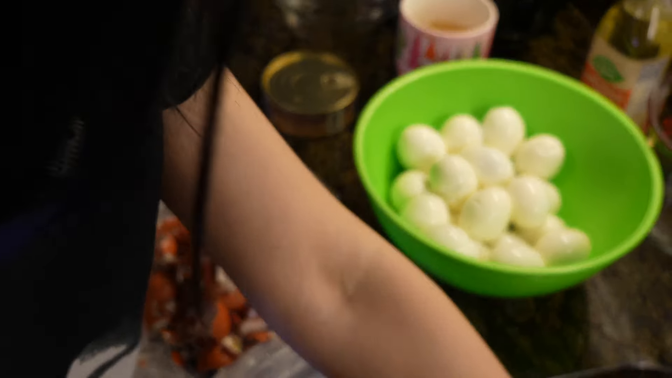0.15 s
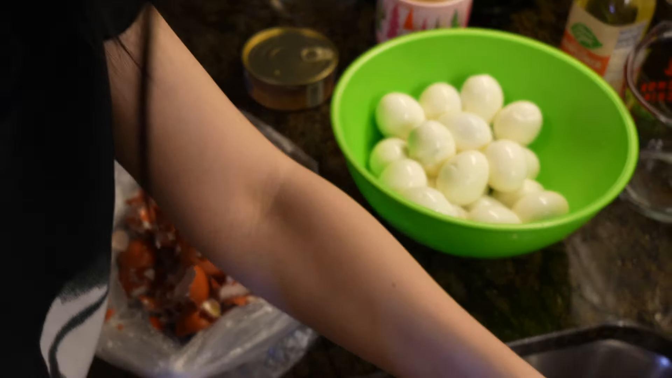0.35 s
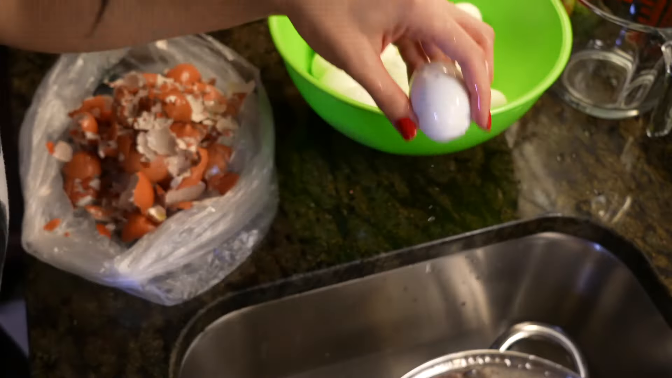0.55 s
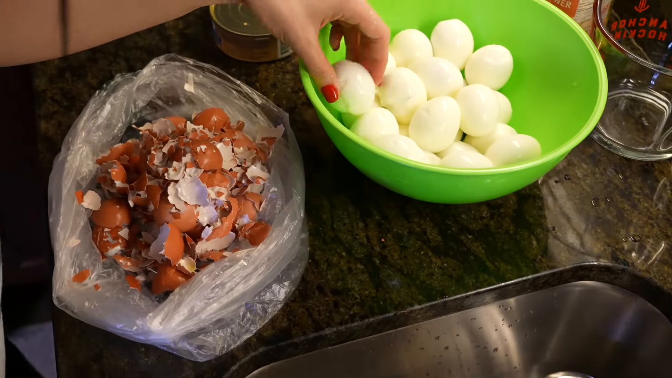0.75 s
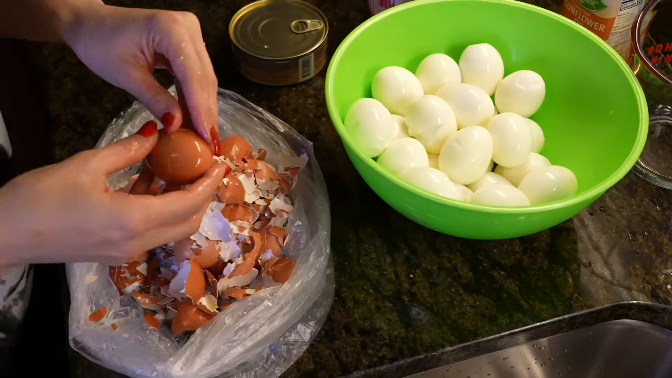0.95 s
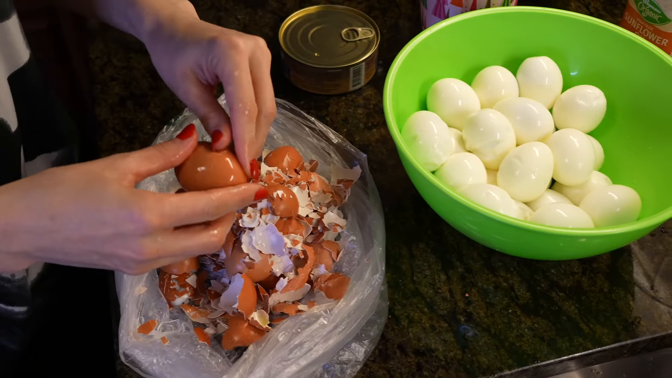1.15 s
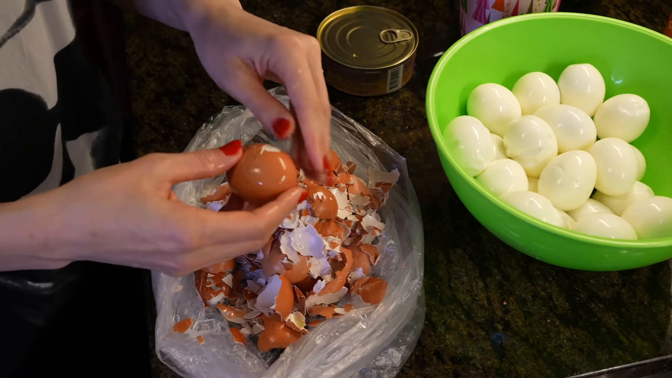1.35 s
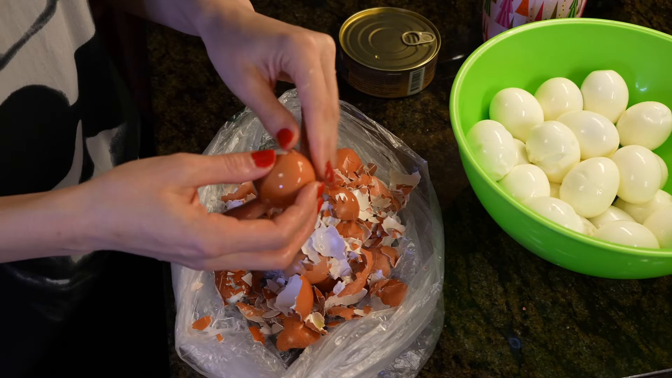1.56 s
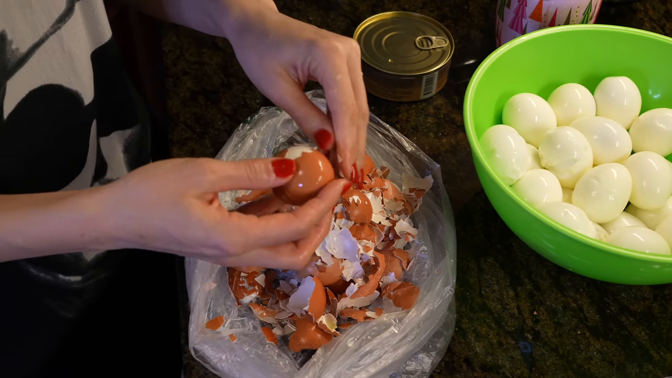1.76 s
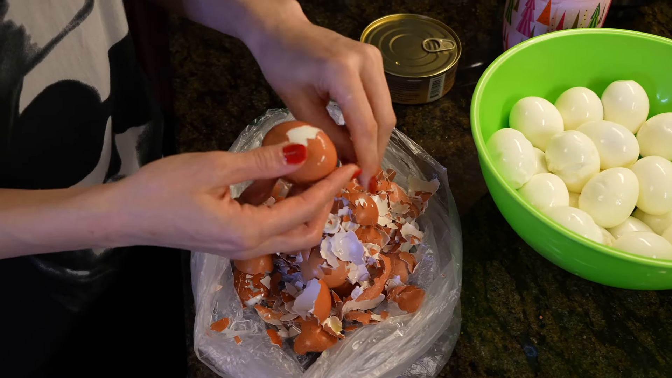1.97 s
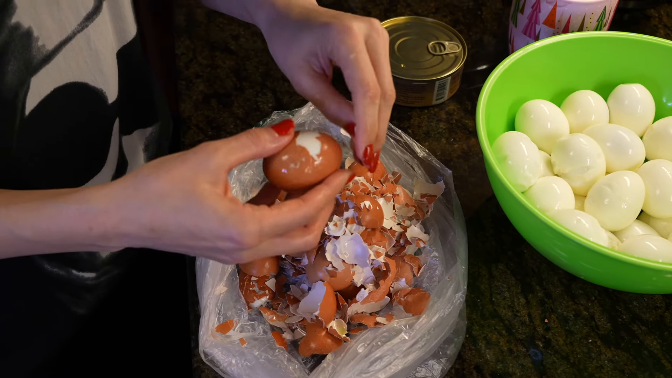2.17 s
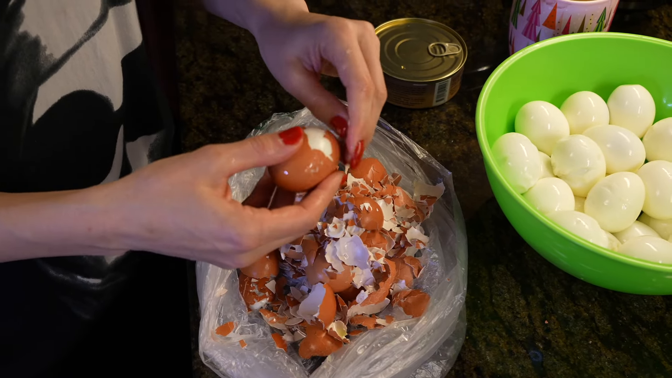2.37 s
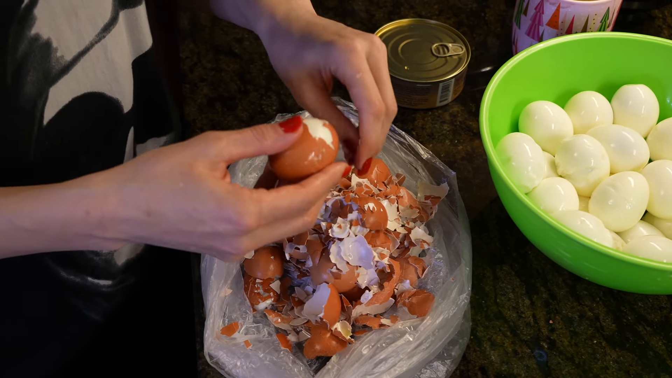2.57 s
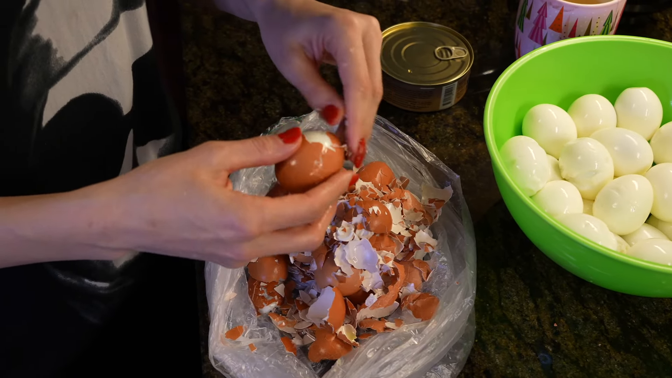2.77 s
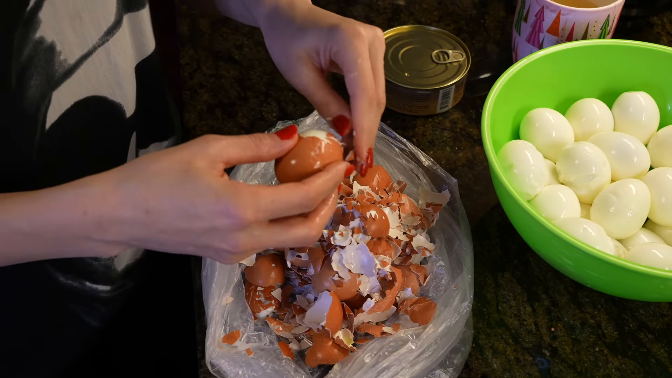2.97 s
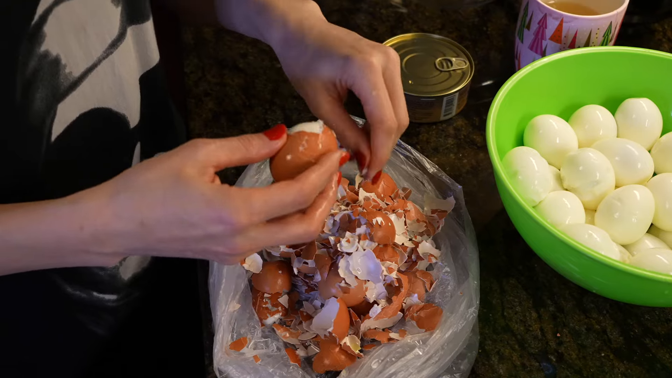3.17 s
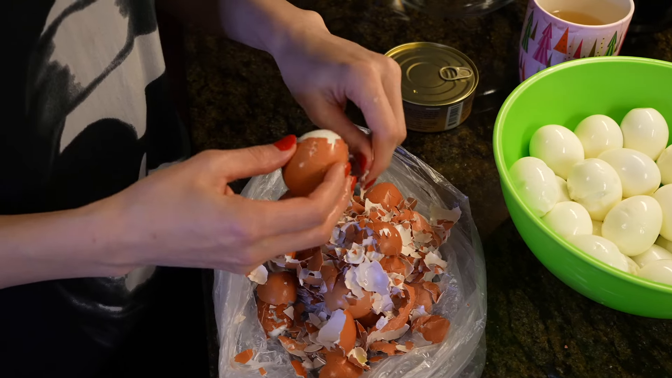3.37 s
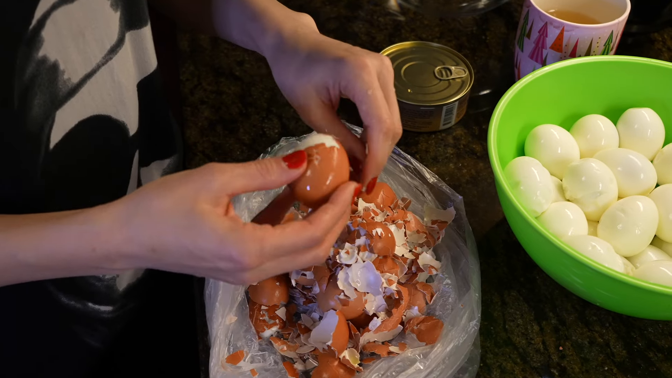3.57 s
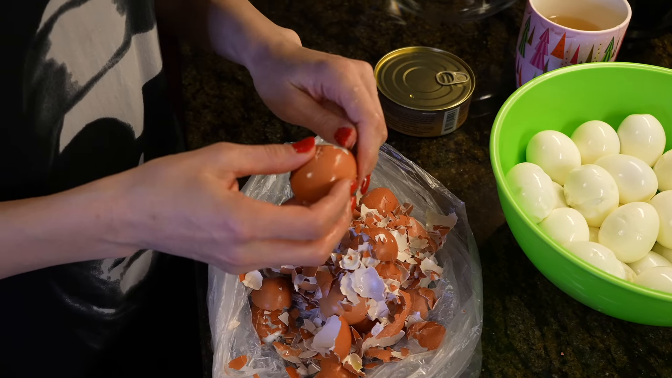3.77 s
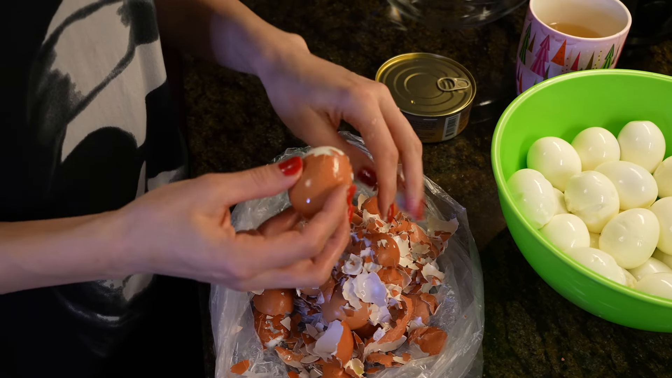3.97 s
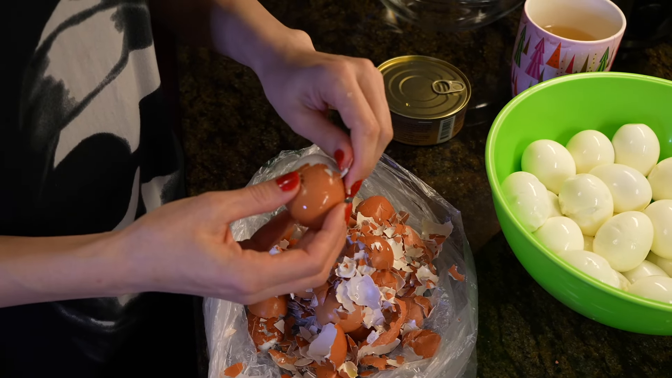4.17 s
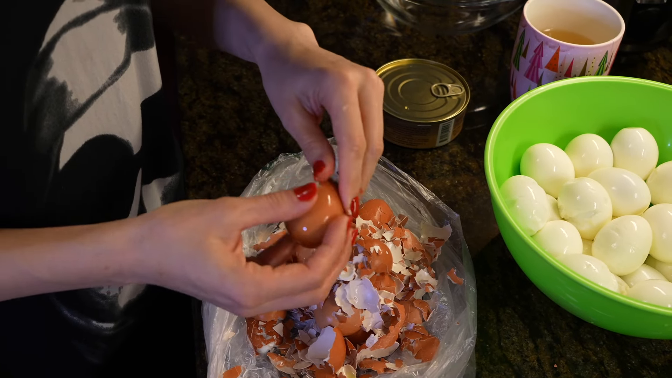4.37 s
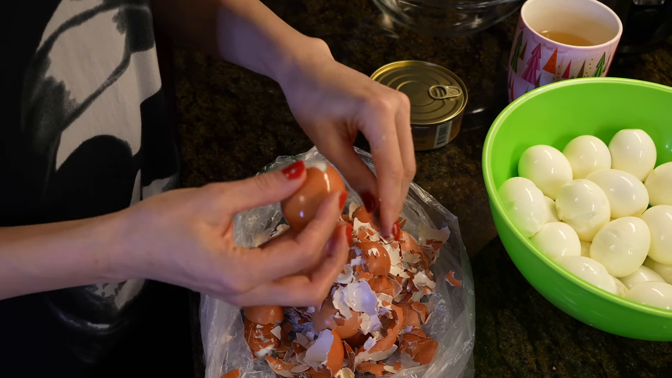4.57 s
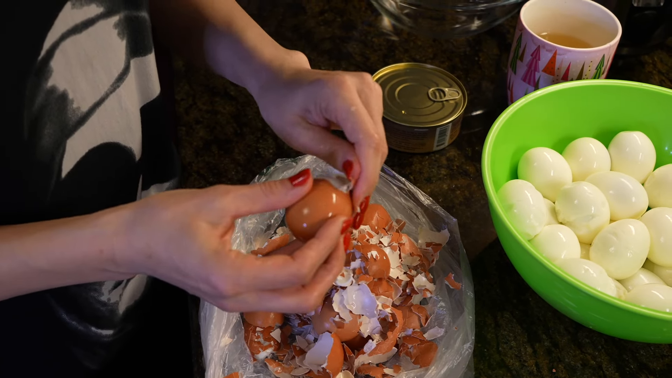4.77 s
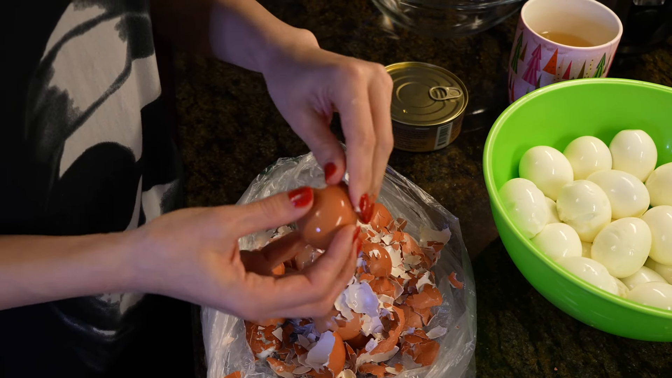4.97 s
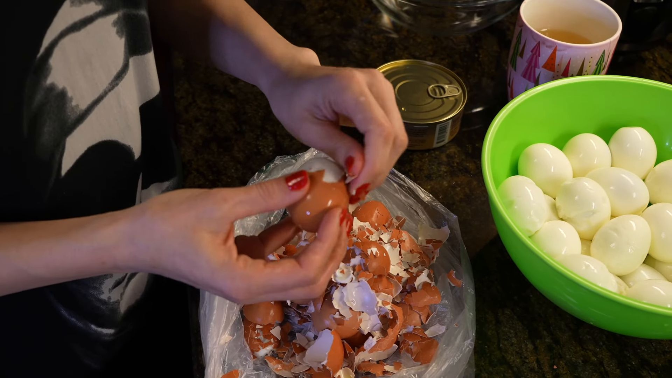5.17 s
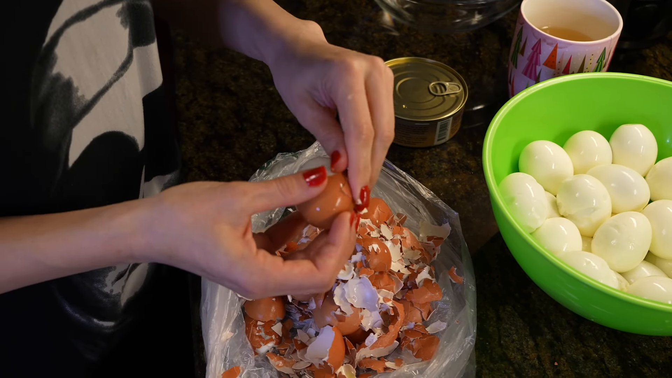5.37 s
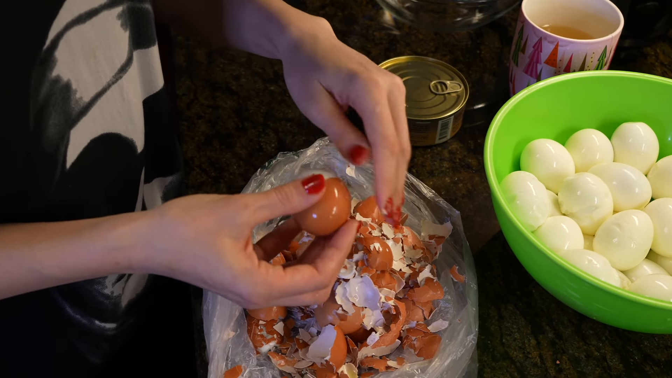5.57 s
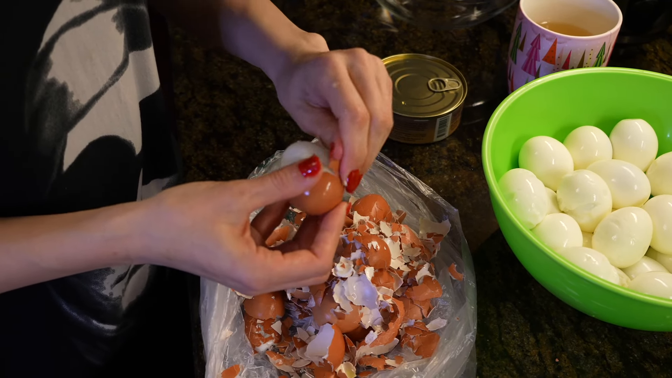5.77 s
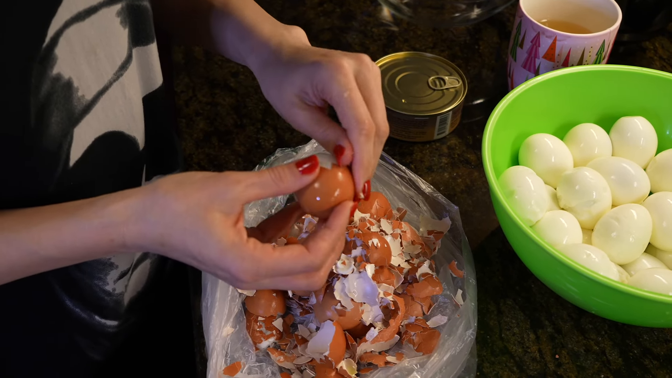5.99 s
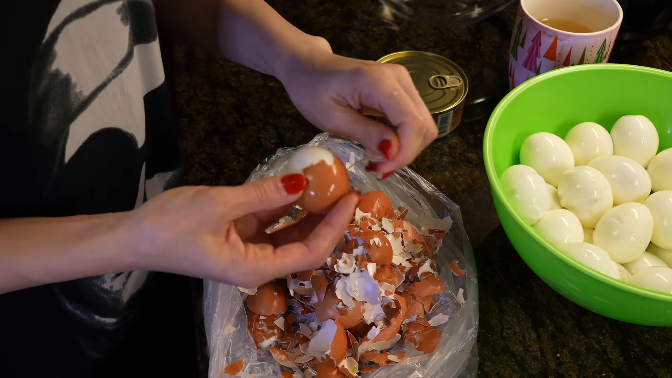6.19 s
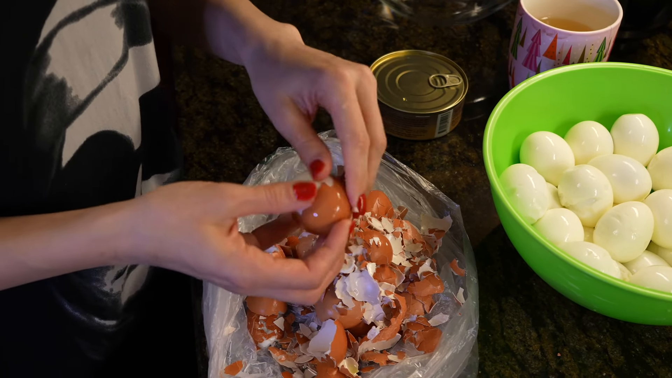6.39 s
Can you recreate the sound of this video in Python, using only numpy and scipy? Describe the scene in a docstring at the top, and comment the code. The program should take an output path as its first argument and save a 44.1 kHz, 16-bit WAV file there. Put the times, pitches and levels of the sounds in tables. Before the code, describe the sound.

A short bright splash of water with bubbly plinks in a steel strainer, then quiet eggshell crackles and soft finger knocks over a faint fridge hum.

```python
"""Boiled eggs are handled over a sink and then peeled by hand in a quiet kitchen.
First water splashes in a steel strainer: hiss and grains, ringing bubbles and smacks on the steel.
Then shell cracks in thin bright snaps of click and fizz, fingers knock softly on low ringing modes,
and one drop falls with steady and gliding rings. Behind it all a refrigerator hums in wavering tones
and air noise, while something hollow drones near 833 Hz and swells when the hands knock."""
import sys
import numpy as np
from scipy import signal
from scipy.fft import rfft, irfft
from scipy.io import wavfile
from scipy.ndimage import uniform_filter1d

SR = 44100
rng = np.random.default_rng(int(sys.argv[2]) if len(sys.argv) > 2 else 0)


def pcm_store(signal):
    """Save signal as 16-bit PCM."""
    levels = np.round(np.clip(np.atleast_2d(signal), -1, 1) * 32767)
    wavfile.write(sys.argv[1], SR, levels.astype(np.int16).T)


N = 283563

# The course of the splash. Each row: time in seconds, slosh level in dB, spray level in dB.
SPLASH_COURSE = [(0.0, -33.5, -57), (0.106, -39.5, -34.5), (0.248, -36.5, -30), (0.29, -36.5, -28),
                 (0.335, -42, -34), (0.35, -38.5, -24.5), (0.4, -26, -29), (0.46, -37, -28),
                 (0.516, -36.5, -44), (0.582, -39, -54), (0.66, -92, -76)]
# Soft knocks of fingers and egg. Each row: start in seconds, level in dB, level of the scuff in dB.
FINGER_KNOCKS = [(1.228, -31, -17), (1.283, -34, -16), (1.32, -45, -13), (1.478, -40, -4), (1.77, -39, -18),
                 (1.957, -34.5, -20), (2.042, -34, -19), (2.148, -42, -18), (2.357, -30, -30),
                 (2.543, -31.5, -19), (2.688, -35, -23), (2.734, -42.5, -1.5), (2.833, -45.5, 7.5),
                 (3.044, -34.5, -15), (3.3, -39, -8), (3.387, -36, -21), (3.504, -33.5, -10.5),
                 (3.606, -33, -18), (3.737, -36, -13), (3.924, -39.5, -10), (4.037, -41, -11.5),
                 (4.222, -33.5, -11), (4.257, -34, -24), (4.403, -39, -10), (4.52, -36.5, -3),
                 (4.856, -30, -21), (5.05, -39.5, -17), (5.128, -35.5, -15), (5.177, -37, -9),
                 (5.209, -38, -7), (5.296, -36, -7.5), (5.459, -42, -10.5), (5.628, -37.5, -8),
                 (5.815, -41, -17), (6.202, -40, -3)]


def amp(db):
    """dB to gain."""
    return 10 ** (np.asarray(db) / 20)


def evened(x):
    """Scales to rms 1."""
    return x / np.sqrt(np.mean(x ** 2) + 1e-20)


def curve(rows, column=1):
    """Draws a table column as a line over all samples."""
    rows = np.array(rows)
    return np.interp(np.arange(N) / SR, rows[:, 0], rows[:, column])


def coloured(x, points):
    """Filters x by a spectrum of (Hz, dB) points."""
    hz, db = np.transpose(points)
    f = np.fft.rfftfreq(len(x), 1 / SR)
    gain = amp(np.interp(np.log(f + 1), np.log(hz + 1), db))
    return irfft(rfft(x) * gain, len(x))


def band(x, lo_hz, hi_hz):
    """Band-pass."""
    return signal.sosfilt(signal.butter(2, [lo_hz, hi_hz], "band", fs=SR, output="sos"), x)


def add(mix, s, sound):
    """Mixes a sound in at second s."""
    part = mix[round(s * SR):][:len(sound)]
    part += sound[:len(part)]


def clicks(per_s, spread_db):
    """A sparse random train of clicks, a few of them large."""
    size = amp(spread_db * np.minimum(rng.exponential(1, N), 4)) * rng.choice([-1., 1.], N)
    return size * (rng.random(N) < per_s / SR)


def wander(span):
    """Slow random motion of rms 1: noise averaged twice over span samples."""
    return evened(uniform_filter1d(uniform_filter1d(rng.standard_normal(N), span), span))


def attack(t, rise_s):
    """A smooth onset that nears 1 with time constant rise_s."""
    return 1 - np.exp(-t / rise_s)


def modes(rows, t):
    """Sums decaying sines, one per (Hz, dB, t60 s) row: the ring of a struck body."""
    return sum(amp(db - 60 * t / t60) * np.sin(2 * np.pi * hz * t) for hz, db, t60 in rows)


def echoed(x, wet_db, t60):
    """Close walls throw back a short scatter of echoes, which roughens every ring."""
    taps = np.zeros(3000)
    at = np.arange(60, 2960, 40) + rng.integers(0, 40, 73)
    taps[at] = rng.choice([-1., 1.], len(at)) * amp(-60 * at / SR / t60)
    taps *= amp(wet_db) / np.linalg.norm(taps)
    taps[0] = 1  # direct sound
    return signal.oaconvolve(x, taps)[:N]


def fridge_air(level):
    """Air noise: coloured random hiss with hollows and humps in its spectrum."""
    # Colour of the air. Each row: frequency in Hz, relative level in dB.
    air_colour = [(12, -62), (20, -20), (179, -30.5), (237, -23), (289, -27.5), (479, -18), (599, -47),
                  (816, -5.5), (913, -9), (994, -7), (1240, -8.5), (2810, -13.5), (7100, -29),
                  (15200, -37.5), (16500, -57)]
    # Hollows and humps. Each row: centre in Hz, width in Hz, gain in dB.
    dips = [(1270, 20, -5.5), (2280, 390, -3.5), (2650, 38, -2), (3000, 80, -2), (3500, 270, 2),
            (3900, 100, -1.5)]
    f = np.fft.rfftfreq(N, 1 / SR)
    hollow = amp(sum(db * np.exp(-((f - hz) / width) ** 2) for hz, width, db in dips))
    air = irfft(rfft(coloured(rng.standard_normal(N), air_colour)) * hollow, N)
    return air * level / np.std(band(air, 1100, 6000))


def fridge_tones(t, level):
    """Motor tones: sines whose strength and phase waver at random and follow the air level."""
    # Each row: frequency in Hz, level in dB.
    hum = [(236.9, -71), (331.5, -87), (414.3, -78.5), (479.6, -70), (662.5, -78.5), (688.5, -72),
           (947.5, -69), (960, -68), (994, -55.5), (1041.7, -67.5), (1325.4, -68), (1377, -76.5),
           (1440.6, -70.5), (1666.2, -75), (1922, -73), (2498, -74), (2842, -78.5), (2880.7, -70),
           (3316.8, -73), (4231, -78), (4715, -79)]
    tones = 0
    for hz, db in hum:
        swing, slip = wander(2000), wander(2000)
        depth = min(hz / 480, 1) ** 3  # low tones are steadier
        phase = 2 * np.pi * (hz * t + rng.random()) + .55 * depth * slip
        tones = tones + amp(db + 3) * (1 + .33 * depth * swing) * np.sin(phase)
    return tones * (level / level.mean()) ** 3.2


def fridge():
    """The refrigerator: air noise and wavering motor tones."""
    # Each row: time in seconds, level of the air in dB.
    air_level = [(0.6, -55.5), (0.73, -59), (1.04, -58), (1.96, -57), (6.43, -57)]
    t, level = np.arange(N) / SR, amp(curve(air_level))
    return fridge_air(level) + fridge_tones(t, level)


def hollow_drone():
    """Handling shakes something hollow: a sine in narrow noise swells at random and with each knock."""
    # Slow level of the drone. Each row: time in seconds, level in dB.
    drone_level = [(0.6, -66), (0.9, -63), (1.2, -51), (1.6, -57), (1.8, -53), (2.2, -52), (2.3, -56),
                   (6.0, -53), (6.43, -51)]
    drone_hz, swell_s, swell_db = 833.3, 0.028, 3.5
    lift_s, lift_db = 0.02, 6  # time to the peak, and its height for a usual knock
    lift_per_db, usual_knock_db = 0.5, -32
    t = np.arange(N) / SR
    drone = np.sin(2 * np.pi * drone_hz * t) + 0.3 * evened(band(rng.standard_normal(N), 760, 860))
    swell = wander(max(round(swell_s * SR), 1))
    lift, u = np.zeros(N), t[:8000] / lift_s
    for s, db, _ in FINGER_KNOCKS:
        height_db = lift_db + lift_per_db * (db - usual_knock_db)
        add(lift, s, height_db * u * np.exp(1 - u))
    # a dull rustle swells with the drone
    flutter = amp(-16) * evened(band(rng.standard_normal(N), 450, 1600))
    drone_db = curve(drone_level) + swell_db * np.minimum(swell, 1.3) + np.minimum(lift, 13)
    return amp(drone_db) * (drone + flutter)


def drip():
    """A drop's bubbles ring: one steady, one gliding up, one late; the sink adds a fizzy tail."""
    # Each row: start in seconds, level in dB.
    drops = [(2.2565, -20)]
    out, t = np.zeros(N), np.arange(5000) / SR
    steady = np.sin(2 * np.pi * 5550 * t) * amp(1 - 60 * t / .032)
    rising = np.sin(2 * np.pi * (5300 * t + 210000 * t ** 2)) * amp(4 - 60 * abs(t - .004) / .016)
    late = np.sin(2 * np.pi * 6300 * t) * amp(-3 - 60 * abs(t - .014) / .015)
    tail = evened(band(rng.standard_normal(len(t)), 3220, 6500)) * amp(-8 - 60 * t / 0.082)
    start_s, db = drops[0]
    add(out, start_s, amp(db - 8.5) * (steady + rising + late + tail) * attack(t, 0.00011))
    return echoed(out, -1.5, 0.053)


def knocks():
    """A soft push rings the low modes of counter and bowl, under a dull scuff of decaying noise."""
    # Modes of counter and bowl. Each row: frequency in Hz, relative level in dB, t60 in seconds.
    body = [(519, -21, 0.021), (720, -26, 0.015), (833, 4, 0.055), (1000.5, 1, 0.092), (1144, 8.5, 0.014)]
    out, t = np.zeros(N), np.arange(6000) / SR
    ring = modes(body, t)
    for s, db, scuff_db in FINGER_KNOCKS:
        noise = evened(band(rng.standard_normal(len(t)), 670, 2360))
        scuff = amp(scuff_db - 60 * t / 0.19) * noise
        add(out, s, amp(db - 8.5) * (ring + scuff) * attack(t, 0.0015))
    return out


def shell():
    """Each snap is a sharp click and a brief fizz of splinters; faint snaps and crackle are random."""
    # Each row: start in seconds, level in dB, relative level of the dull part in dB.
    snaps = np.array([(1.307, -46, -21), (1.339, -43, -14), (1.7496, -49, -17), (1.9277, -46.5, -33),
                      (2.2582, -46, -2), (2.3579, -47, -16), (2.4753, -48, -26), (2.5447, -40.5, -20),
                      (2.7074, -47.5, -12), (2.8317, -49, 1.5), (2.945, -47, -13), (3.1404, -40, -13),
                      (3.1647, -39, -16), (3.3443, -40.5, -18), (3.3892, -43.5, -13.5), (3.9189, -42, -24),
                      (3.9242, -38.5, -11), (3.9275, -30.5, -36), (3.9362, -24.5, -33), (3.938, -34, -30),
                      (3.9435, -36, -29), (4.0365, -43.5, -6.5), (4.0402, -41, -18), (4.1654, -38.5, -18),
                      (4.2197, -49, -5), (4.2458, -38, -23), (4.2588, -26, -23), (4.5197, -30.5, -11),
                      (4.5317, -46, -6.5), (4.7954, -39, -19), (4.805, -43, -39), (4.964, -37.5, -11.5),
                      (5.0532, -46, -34), (5.1106, -47, -35), (5.1282, -36.5, -24), (5.1565, -32, -22),
                      (5.175, -17, -34), (5.1846, -24, -41), (5.1974, -40, -35), (5.2118, -34, -30),
                      (5.4681, -33.5, -20), (5.7342, -46, -36.5), (5.7925, -46, -8), (5.813, -29.5, -23),
                      (5.8396, -42, -25), (5.9192, -42, -35), (5.9692, -45, -5.5), (6.133, -38, -23),
                      (6.2095, -41, -12)])
    # Colour of a snap. Each row: frequency in Hz, gain in dB.
    shell_colour = [(3000, -45.5), (8000, -30), (10500, -17), (12000, -5), (13500, -2), (15500, -1.5),
                    (16000, 1), (16400, -9.5)]
    after_s, after_db, after_spread_db = (0.0027, 0.024), -10.5, 13
    peel_start_s, faint_db, faint_spread_db = 1.0, -52, 3
    faint_dull_db, crackle_db = (-35, -9), -77
    bright, dull, t = np.zeros(N), np.zeros(N), np.arange(2000) / SR

    # two smaller cracks run on from every listed snap
    luck = rng.random((len(snaps), 2, 2))
    after = []
    for k in (0, 1):
        delay_s = np.interp(luck[:, k, 0], (0, 1), after_s)
        change_db = after_db - after_spread_db * luck[:, k, 1]
        after.append(snaps + np.c_[delay_s, change_db, np.zeros(len(snaps))])
    low = (peel_start_s, faint_db - faint_spread_db, faint_dull_db[0])
    high = (N / SR, faint_db + faint_spread_db, faint_dull_db[1])
    faint = rng.uniform(low, high, size=(55, 3))

    for s, db, dull_db in np.vstack([snaps, *after, faint]):
        noise = rng.standard_normal((3, len(t)))
        fizz = amp(-19.0 - 60 * t / 0.034) * noise[0]
        snap = fizz + amp(-2.5 - 60 * t / 0.0019) * noise[2]
        snap[0] += 1  # the click
        add(bright, s, amp(db + 13) * snap)
        add(dull, s, amp(db + dull_db + 5 - 60 * t / 0.037) * noise[1])
    crackle = coloured(evened(clicks(300, 5.6)) + rng.standard_normal(N), shell_colour)
    return coloured(bright, shell_colour) + band(dull, 860, 6800) + amp(crackle_db) * evened(crackle)


def bubbles(lo_hz, hi_hz, per_s, t60):
    """Dense water grains: random short rings at eight pitches."""
    t = np.arange(900) / SR
    grains = 0
    for hz in np.geomspace(lo_hz, hi_hz, num=8):
        ring = np.sin(2 * np.pi * hz * t) * amp(-60 * t / t60)
        grains = grains + signal.oaconvolve(clicks(per_s, 4.625), ring)[:N]
    return evened(grains)


def water(steel):
    """Hiss and grains in a low slosh and a high spray; the slosh keeps the strainer ringing."""
    # Colours of the two layers. Each row: frequency in Hz, relative level in dB.
    slosh_colour = [(35, -71), (60, -38.5), (284, -27.5), (504, -2.5), (895, -20), (991, -9.5), (1620, -2),
                    (1990, -9.5), (2390, 3), (2990, -6), (4420, -3.5), (5770, -20.5), (8000, -7),
                    (10400, -38.5), (17600, -120)]
    spray_colour = [(3530, -31), (6000, -2.5), (6930, -6.5), (11700, 0.5), (15200, 8.5), (16200, -11),
                    (16500, -35.5)]
    on = np.clip((SPLASH_COURSE[-1][0] - np.arange(N) / SR) / 0.015, 0, 1)  # fades out at the last row
    gusts = amp(1.7 * wander(250))  # water arrives in gulps
    ringing = evened(signal.oaconvolve(clicks(250, 5.), steel)[:N])
    slosh = evened(coloured(rng.standard_normal(N), slosh_colour))
    slosh += amp(-9) * bubbles(1100, 6500, 30, .03) + amp(-9) * ringing
    spray = evened(coloured(rng.standard_normal(N), spray_colour))
    spray += amp(-8) * bubbles(8000, 15500, 150, 0.008)
    spray += amp(-7) * evened(coloured(clicks(500, 5.46), spray_colour))
    slosh_gain, spray_gain = amp(curve(SPLASH_COURSE)), amp(curve(SPLASH_COURSE, column=2))
    return on * gusts * (slosh_gain * slosh + spray_gain * spray)


def pings(t):
    """Bubbles ring as sines that climb while they decay; tiny drops spit in fuzzier, shorter rings."""
    # Bubbles and drops. Each row: start in seconds, level in dB, starting pitch in Hz.
    listed = [(0.039, -13, 2177), (0.04, -9.5, 7260), (0.0398, -16, 3130), (0.046, -21, 2370),
              (0.1076, -20, 4400), (0.1347, -22, 3380), (0.1938, -20, 14400), (0.194, -24.5, 4100),
              (0.215, -12, 6300), (0.2211, -15, 11900), (0.2388, -15, 11800), (0.2434, -10, 3660),
              (0.252, -12.5, 6200), (0.2516, -19, 2460), (0.2625, -17.5, 13300), (0.2768, -20.5, 10600),
              (0.3012, -7, 3810), (0.3055, -13, 4540), (0.3166, -26, 15000), (0.317, -27, 10100),
              (0.3316, -10.5, 2475), (0.3389, -14.5, 4330), (0.3449, -12, 6100), (0.339, -18, 6400),
              (0.3448, -17, 11500), (0.3534, -15.5, 6530), (0.351, -11, 3370), (0.3617, -21.5, 13380),
              (0.3836, -25.5, 11750), (0.357, -13.5, 2336), (0.3664, -14.5, 3750), (0.3752, -16.5, 2550),
              (0.3835, -26.5, 1450), (0.3859, -15, 6000), (0.398, -11, 6000), (0.418, -15, 4360),
              (0.4214, -16.5, 1726), (0.4376, -17.5, 2940), (0.4403, -44, 12650), (0.4752, -15.5, 12300),
              (0.477, -11.5, 4340), (0.493, -21, 3260), (0.5366, -16.5, 2485), (0.5557, -21.5, 2460),
              (0.5828, -22, 2394), (0.5857, -16, 1783), (0.647, -30, 2870), (0.6767, -42.5, 14100),
              (0.732, -44.5, 4780), (0.7417, -37, 5900), (0.757, -51, 9400), (0.8041, -39.5, 9500),
              (0.8087, -44, 13100), (0.835, -50, 14100)]
    ring_cycles = 78  # a larger bubble dies 60 dB in so many cycles of its starting pitch
    climb_per_s = 10.94  # rise of pitch per second, as a fraction of the starting pitch
    # random tiny drops at the height of the spray
    spit_span_s, spit_hz, spit_over_spray_db, spit_spread_db = (0.092, 0.46), (9870, 15500), -2, 9.5
    low = (spit_span_s[0], -spit_spread_db, spit_hz[0])
    high = (spit_span_s[1], spit_spread_db, spit_hz[1])
    spits = rng.uniform(low, high, size=(30, 3))
    spray_db = curve(SPLASH_COURSE, column=2)
    spits[:, 1] += spit_over_spray_db + spray_db[(spits[:, 0] * SR).astype(int)]

    drops, tick_t = np.zeros(N), t[:400]
    for s, db, hz in [*listed, *spits]:
        tiny = hz > 8000  # tiny drops spit, larger bubbles ring
        width, t60, fuzz_db = (.2, .011, 5) if tiny else (.06, ring_cycles / hz, -8)
        edges = (1 - width) * hz, (1 + width) * hz
        fuzz = amp(fuzz_db) * evened(band(band(rng.standard_normal(len(t)), *edges), *edges))
        ring = np.sin(2 * np.pi * hz * (t + climb_per_s / 2 * t ** 2))
        add(drops, s, amp(db - 60 * t / t60) * (ring + fuzz) * attack(t, 0.00032))
        # the tick of impact
        tick = evened(band(rng.standard_normal(400), 0.577 * hz, min(1.5 * hz, 16000)))
        add(drops, s, amp(db - 7.5 - 60 * tick_t / 0.00563) * tick)
    return echoed(drops, -3, 0.082)


def smacks(t, steel):
    """Water smacks the strainer: dull and bright noise bursts, the steel's ring and a low thump."""
    # Each row: start in seconds, level in dB, then relative levels in dB of ring, dull and bright part.
    hits = [(0.0004, -6, -2, -8.5, -15.5), (0.0385, -4.5, -26, -11.5, -14.5), (0.108, -9, -1.5, -8.5, -11),
            (0.1341, -17.5, 0, -8.5, -16), (0.1905, -31, -12, -13, -12), (0.2531, -23, -11, -9, 7.5),
            (0.2638, -19.5, -2.5, -8.5, 6), (0.3435, -31, -12, -24, -14), (0.3853, -4.5, -4, -14.5, -15.5),
            (0.4173, -19, -27.5, -20, -17), (0.4793, -9, 2.5, -22.5, -24), (0.518, -21, 10, -24, -7.5),
            (0.5343, -13, 3, -7, -36), (0.5825, -15, 12.5, -11.5, -9), (0.6455, -27, 7.5, -12.5, -24),
            (0.675, -34.5, -2, -30, -9.5), (0.74, -39, -20, -13, -3), (0.803, -36.5, -25, -10, -13)]
    out, low = np.zeros((2, N))
    for s, db, ring_db, dull_db, bright_db in hits:
        noise = rng.standard_normal((3, len(t)))
        dull = amp(dull_db - 5 - 60 * t / 0.084) * evened(band(noise[0], 600, 5200))
        bright = amp(bright_db + 0.5 - 60 * t / 0.04) * evened(band(noise[1], 7100, 16000))
        bright *= attack(t, 0.0019)
        thump = amp(dull_db - 33 - 60 * t / 0.069) * evened(band(noise[2], 40, 440))
        ring = amp(ring_db - 15) * steel
        add(out, s, amp(db) * (dull + bright + ring) * attack(t, 0.00013))
        add(low, s, amp(db) * thump * attack(t, .004))
    return out, low


def splash():
    """Water in the strainer: layers, pings and smacks lose their lows; the thumps keep theirs."""
    # Modes of the strainer. Each row: frequency in Hz, relative level in dB, t60 in seconds.
    strainer = [(1402, 0.5, 0.02), (1822, -6, 0.087), (2340, 3.5, 0.043), (2636, -1.5, 0.036),
                (3620, -11.5, 0.076), (4450, -5.5, 0.017), (6750, -28, .06)]
    t = np.arange(5000) / SR
    steel = modes(strainer, t)
    hits, thumps = smacks(t, steel)
    out = water(steel) + pings(t) + hits
    return signal.sosfilt(signal.butter(2, 350, "high", fs=SR, output="sos"), out) + thumps


def scene():
    """All sources, one channel."""
    return (fridge() + hollow_drone() + drip() + knocks() + shell() + splash())[None]


def record(dry):
    """The band limit: a steep low-pass."""
    edge_hz = 16050
    lowpass = signal.firwin(255, edge_hz, window=("kaiser", 9), fs=SR)
    return signal.oaconvolve(dry, lowpass[None], "same")


dry = scene()
out = record(dry)
pcm_store(out)
```